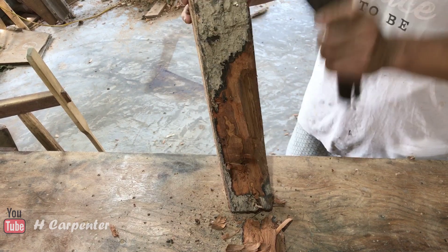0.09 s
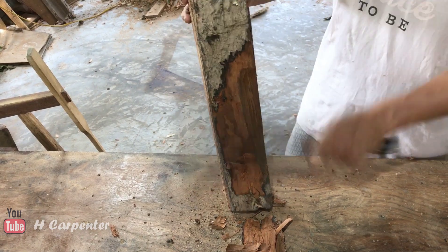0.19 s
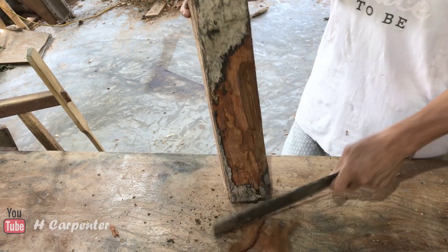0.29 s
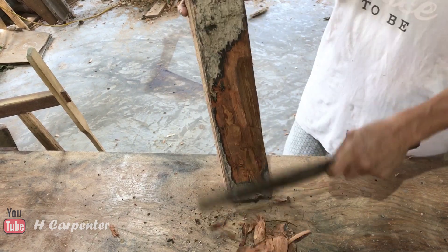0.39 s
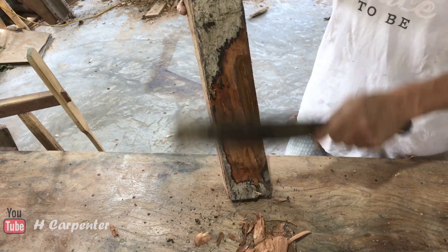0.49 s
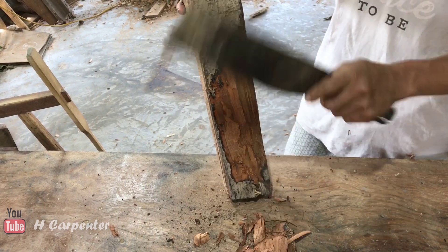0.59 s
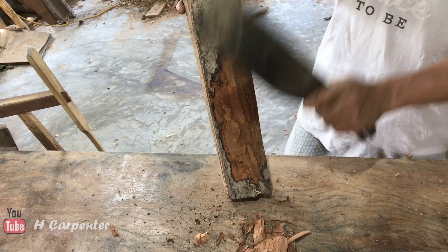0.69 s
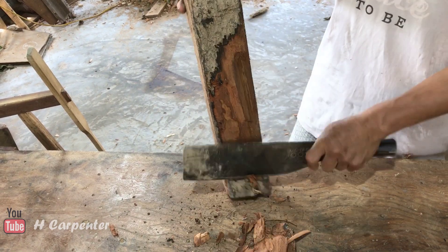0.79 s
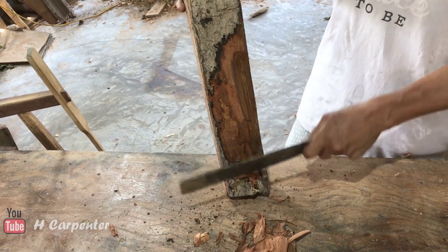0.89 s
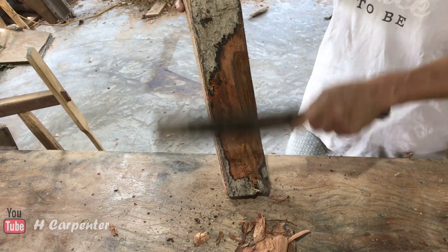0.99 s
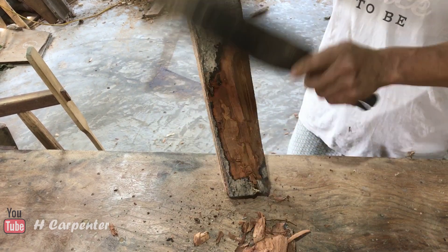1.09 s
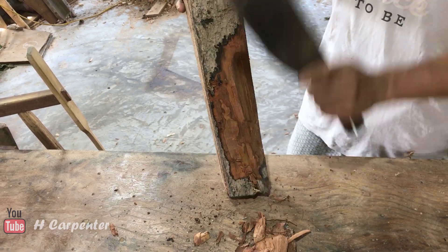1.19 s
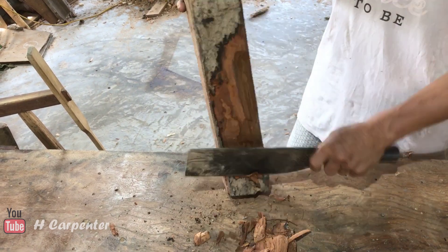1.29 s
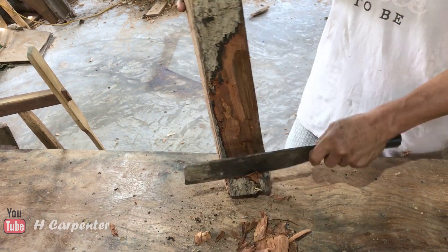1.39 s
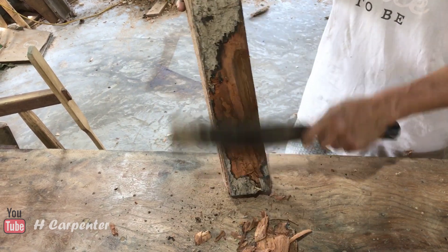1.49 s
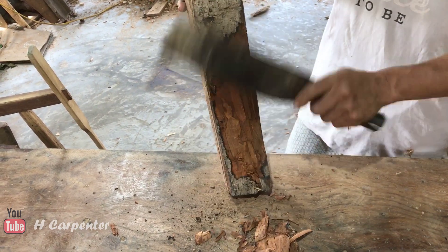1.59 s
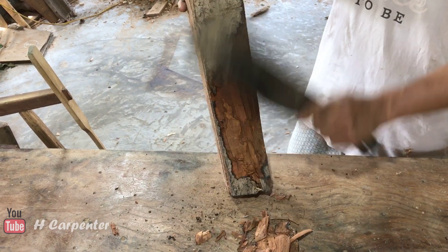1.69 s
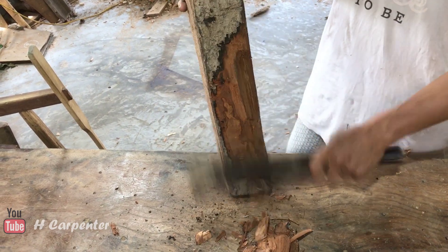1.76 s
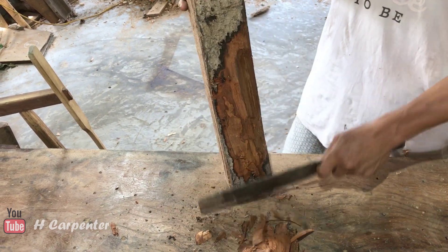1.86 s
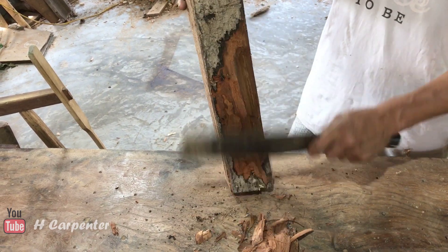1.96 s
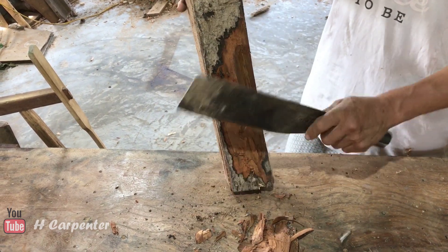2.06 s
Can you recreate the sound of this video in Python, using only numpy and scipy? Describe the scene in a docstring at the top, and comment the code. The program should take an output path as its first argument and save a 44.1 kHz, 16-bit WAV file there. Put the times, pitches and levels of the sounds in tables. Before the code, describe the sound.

A broad blade hews wood with four spaced, sharp knocking blows and low bench thumps

```python
"""A broad blade hews the edge of a board on a workbench in a hard-walled workshop: each blow is a contact
force that rings the board's modes, with fibre noise, a knock, and a thump and hum of the bench.
Two blows tear a chip off strongly and go through onto the bench top; the board hops back twice onto the bench.
Crumbs tick and dust patters as filtered noise; the room adds band-by-band decaying noise.
Behind lie air noise and a low outdoor rumble that swells near 1.4 s; a limiter holds the peaks."""
import sys
import numpy as np
from scipy import signal
from scipy.fft import rfft, irfft
from scipy.io import wavfile
from scipy.ndimage import uniform_filter1d, minimum_filter1d

SR = 44100
rng = np.random.default_rng(int(sys.argv[2]) if len(sys.argv) > 2 else 0)


def waveform_to_disk(signal):
    """Save audio, clipped to [-1, 1], as 16-bit WAV at the path in sys.argv[1]."""
    frames = np.transpose(np.atleast_2d(signal))
    scaled = np.clip(frames, -1, 1) * 32767
    samples = np.round(scaled).astype(np.int16)
    wavfile.write(sys.argv[1], SR, samples)


N = 94815

# modes of the bench top: (f/Hz, level/dB, T60/s)
BENCH_TOP = [(329.7, -4.5, 0.065), (396.7, -8, 0.042), (472, -8, 0.049), (599, -7.5, 0.047),
             (707, -10.5, 0.072), (790, -5, 0.032), (880, -6, 0.044), (941, -8.5, 0.052),
             (1110.4, -0.5, 0.039), (1252, -10, 0.083), (1327, -3, 0.034), (1382, -5, 0.055),
             (1539, -4, 0.032), (3860, -8, 0.0089)]


def amp(db):
    """Decibel law: level in dB to amplitude ratio."""
    return 10 ** (np.asarray(db) / 20)


def rms_one(x):
    """Normalisation: scale to unit rms."""
    return x / np.sqrt(np.mean(x ** 2) + 1e-20)


def at_hz(points, hz):
    """Linear interpolation of a table on a log-frequency axis."""
    table_hz, values = np.array(points).T
    return np.interp(np.log(np.maximum(hz, 1)), np.log(table_hz), values)


def in_time(rows):
    """Linear interpolation of a level curve at every sample."""
    return np.interp(np.arange(N) / SR, *np.transpose(rows))


def colour(x, spectrum):
    """Spectral shaping: weight each frequency of a noise, then set its rms to 1."""
    hz = np.fft.rfftfreq(len(x), 1 / SR)
    shaped = rfft(x) * amp(at_hz(spectrum, hz))
    return rms_one(irfft(shaped, len(x)))


def burst(s, hold_s, fall_s):
    """Exponential relaxation: sudden start at s, a hold, then a fall with time constant fall_s."""
    t = np.arange(N) / SR - s
    return (t >= 0) * np.exp(-np.maximum(t - hold_s, 0) / fall_s)


def ring(drive, modes):
    """Modal superposition: the drive excites damped resonators of slightly random strength."""
    spread_db = 0.5
    out = 0
    for k, (hz, db, t60) in enumerate(modes):
        radius = amp(-60 / (t60 * SR))   # decay per sample
        w = 2 * np.pi * hz / SR
        gain = amp(db + spread_db * rng.standard_normal()) * (-1) ** k   # polarity alternates
        poles = [1, -2 * radius * np.cos(w), radius * radius]
        out = out + signal.lfilter([0, gain * np.sin(w)], poles, drive + 1e-18)
    return out


def contact(s, length_s, judder):
    """Impact excitation: one unit impulse with a judder of small random ones."""
    sparse = rng.standard_normal(N) * (rng.random(N) < .3)
    x = judder * sparse * burst(s, length_s, 0.0046)
    x[int(s * SR)] += 1
    return x


def push(s):
    """Soft impulse: a rounded force pulse, too slow to excite much treble."""
    width_s = 0.0035
    t = np.maximum(np.arange(N) / SR - s, 0) / width_s
    return t * np.exp(-3 * t) * 9 / (width_s * SR)   # unit sum


def thump(s, db):
    """Low-frequency modal response: a soft push into the bench frame."""
    # modes of the bench frame: (f/Hz, level/dB, T60/s)
    frame_modes = [(41.7, -12.5, 0.43), (73, -6, 0.085), (108.3, 1.5, 0.084), (179.3, 4.5, 0.22),
                   (208, 1.5, 0.18), (261, -2, 0.16), (329, 13, 0.1), (423.7, 10, 0.15), (569.3, -53, 0.1),
                   (690, 0, .1)]
    return amp(db) * ring(push(s), frame_modes)


def fibres():
    """Shot noise: dense uneven snaps of splitting wood fibres, spectrally shaped."""
    # spectrum of the splitting: (f/Hz, relative level per Hz/dB)
    hiss_spectrum = [(710, -40), (1200, -9), (1530, -3), (2950, -3), (3220, 0), (5510, -12), (6080, -7.5),
                     (6640, -18), (9130, -12), (10300, -15), (14000, -12.5), (15800, -22), (16500, -61)]
    snaps_per_s = 15000
    snaps = (rng.random(N) < snaps_per_s / SR) * rng.standard_normal(N)
    uneven = snaps * amp(1.2 * rng.exponential(1, N))
    return colour(uneven, hiss_spectrum)


def blows():
    """Impact and fracture: board ring, bite hiss, tearing, bench thump and hum; knocks returned apart."""
    # blade bites: (t/s, bite level/dB, bite hold/s, knock f/Hz, knock level/dB, hiss level/dB,
    #               tearing level/dB, tearing hold/s, thump level/dB, hum level/dB)
    blow_table = [(0.2229, -15.5, 0.0055, 2530, -7, -22, -14.5, 0.023, -17.5, -19.5),
                  (0.7942, -14, .005, 2029, -5.5, -17, -36, 0.028, -14.5, -22.5),
                  (1.3073, -15, 0.0045, 2066, -10.5, -17.5, -41.5, 0.031, -13.5, -35),
                  (1.7784, -18, 0.0078, 2130, -9, -18, -19, .017, -16.5, -29.5)]
    # modes of the board: (f/Hz, level/dB, T60/s)
    board_modes = [(1004, -5.5, 0.041), (1117, -12, 0.037), (1628, -8, 0.072), (1755, -16, 0.069),
                   (2410, -25, 0.0089), (3150, -6, .008), (3820, -5.5, 0.021), (4570, -16, 0.009),
                   (5630, -1.5, 0.0049), (7400, -8, 0.0038), (8800, -23, .006), (11120, -6.5, 0.012),
                   (12700, -3, 0.00513)]
    knock_t60_s, hum_hz, hum_t60_s = .045, 124, .9
    out, knocks, snaps = 0, 0, fibres()
    for s, db, bite_s, knock_hz, knock_db, hiss_db, tear_db, tear_s, thump_db, hum_db in blow_table:
        out = out + amp(db) * ring(contact(s, bite_s, .12), board_modes)
        knocks = knocks + ring(contact(s, bite_s, .05), [(knock_hz, knock_db, knock_t60_s)])
        hum = ring(push(s), [(hum_hz, hum_db, hum_t60_s)])
        out = out + thump(s, thump_db) + hum
        hiss = amp(hiss_db) * burst(s, bite_s, 0.0018)
        tearing = amp(tear_db) * burst(s, tear_s, 0.0061)
        out = out + snaps * (hiss + tearing)
    return out, knocks


def landings():
    """Impact on a plate: the blade strikes the bench top and rattles; a one-pole low-pass softens it."""
    # blade lands: (t/s, level before softening/dB, rattle hold/s, thump level/dB)
    landing_table = [(0.2476, -11, 0.0397, -17), (1.8078, -11.5, 0.035, -18)]
    out = 0
    for s, db, rattle_s, thump_db in landing_table:
        top = ring(contact(s, rattle_s, .065), BENCH_TOP)
        softened = signal.lfilter([.4], [1, -.6], top)
        out = out + amp(db) * softened + thump(s, thump_db)
    return out


def board_hops():
    """Secondary impact: the board knocks back onto the bench with a thump and a low-passed rattle."""
    # board knocks back: (t/s, thump level/dB, rattle level before low-pass/dB)
    hop_table = [(.851, -25, -40.5), (1.348, -19, -28.5)]
    rattle_hold_s, cut_hz = 0.029, 670
    dull = signal.butter(4, cut_hz, fs=SR, output="sos")
    out = 0
    for s, db, rattle_db in hop_table:
        rattle = ring(contact(s, rattle_hold_s, 0.18), BENCH_TOP)
        out = out + thump(s, db) + amp(rattle_db) * signal.sosfilt(dull, rattle)
    return out


def crumbs():
    """Band-limited transients: tiny bright ticks, each a few milliseconds of narrow noise."""
    # crumbs land: (t/s, level before band-pass/dB, centre f/Hz)
    crumb_table = [(0.188, -56, 13800), (1.0506, -46, 7900), (1.087, -54, 14500), (1.9296, -41.5, 14000),
                   (1.986, -49, 10800), (2.0159, -46, 10200), (2.028, -51, 12100), (2.048, -49, 6950),
                   (2.0977, -57, 14300), (2.12, -57, 14100)]
    out = 0
    for s, db, hz in crumb_table:
        band = [hz * .8, min(hz * 1.2, .45 * SR)]
        sos = signal.butter(2, band, "band", fs=SR, output="sos")
        tick = rng.standard_normal(N) * burst(s, 0.00068, .0015)
        out = out + amp(db) * signal.sosfilt(sos, tick)
    return out


def dust():
    """Shot noise: sparse high-passed grains patter after the last chip and die away exponentially."""
    start_s, fall_s, start_db = 1.86, .3, -63
    grains_per_s, cut_hz = 1500, 7000
    grains = (rng.random(N) < grains_per_s / SR) * rng.standard_normal(N)
    bright = signal.sosfilt(signal.butter(4, cut_hz, "high", fs=SR, output="sos"), grains)
    return amp(start_db) * rms_one(bright) * burst(start_s, 0, fall_s)


def workshop(x):
    """Diffuse reverberation: convolution with noise that decays exponentially in each half-octave."""
    # reverberation time: (f/Hz, T60/s)
    room_t60 = [(60, 0.35), (250, 0.4), (600, 0.55), (1200, 0.53), (3000, 0.4), (6000, 0.39), (11000, 0.26),
                (16000, 0.34)]
    # reverberant energy by band: (f/Hz, relative level/dB)
    room_colour = [(60, -1.5), (250, -0.5), (600, 1.86), (1200, -0.1), (3000, -4.5), (6000, 1.4),
                   (11000, -3), (16000, -4.5)]
    room_db, start_s = -7.5, 0.0027
    t, tail = np.arange(SR) / SR, 0
    edges = 30 * 2 ** np.arange(0, 9.6, .5)
    white = rng.standard_normal((2, SR))   # neighbouring bands use different noises
    for k, (low, high) in enumerate(zip(edges, edges[1:])):
        hz = np.sqrt(low * high)
        t60 = at_hz(room_t60, hz)
        band = signal.sosfilt(signal.butter(2, [low, high], "band", fs=SR, output="sos"), white[k % 2])
        decay = amp(at_hz(room_colour, hz) - 60 * t / t60)
        tail = tail + band * decay / np.sqrt(t60 * SR / 14)   # energy independent of T60
    tail = tail * np.clip(t / start_s - 1, 0, 1)   # silent until start_s, full at twice that
    return amp(room_db) * signal.fftconvolve(x, tail)[:N]


def air_noise():
    """Stationary random noise: shaped in spectrum, with a drifting level."""
    # spectrum: (f/Hz, relative level per Hz/dB)
    air_spectrum = [(240, -56), (400, -7.5), (600, -12.5), (658, -5), (711, -5.5), (1050, -2.5), (1480, -3),
                    (2550, -9), (2710, -4.5), (4610, -13), (5060, -13), (5640, -16), (10500, -30),
                    (13700, -26.5), (16500, -46.5)]
    # level curve: (t/s, level/dB)
    air_level = [(0.0, -59), (0.24, -58), (0.39, -51.5), (0.57, -61), (0.84, -60.5), (0.95, -56.5),
                 (1.6, -58), (2.15, -55.5)]
    air = colour(rng.standard_normal(N), [(200, -56)] + list(air_spectrum))
    return air * amp(in_time(air_level))


def outdoor_rumble():
    """Amplitude modulation: low noise on a level curve, made lumpy by slow random level changes."""
    # spectrum: (f/Hz, relative level per Hz/dB)
    rumble_spectrum = [(12, -14), (20, -7.5), (76, -8.5), (124, -9), (145, -13), (212, -16.5), (231, -23.5),
                       (278, -16.5), (381, -37), (600, -38), (780, -69), (1320, -120)]
    # level curve: (t/s, level/dB)
    rumble_level = [(0.0, -44.5), (0.15, -44.5), (0.36, -47), (0.51, -52), (0.76, -46), (0.92, -42.5),
                    (1.23, -45), (1.39, -29), (1.56, -45), (2.15, -45.5)]
    lumps_db, lumps_cut_hz = 0.5, 12
    slow = signal.butter(2, lumps_cut_hz, fs=SR, output="sos")
    lumps = rms_one(signal.sosfilt(slow, rng.standard_normal(N + SR))[SR:])   # filter settles first
    spectrum = [(10, -48)] + list(rumble_spectrum) + [(1000, -69)]
    rumble = colour(rng.standard_normal(N), spectrum)
    return rumble * amp(in_time(rumble_level) + lumps_db * lumps)


def scene():
    """Superposition of direct and reverberant sound; the knock beams at the listener and stirs the room less."""
    knock_to_room_db = -7
    board, knocks = blows()
    work = board + landings() + board_hops() + crumbs() + dust()
    reverberation = workshop(work + amp(knock_to_room_db) * knocks)
    return (work + knocks + reverberation + air_noise() + outdoor_rumble())[None]


def record(dry):
    """Peak limiting: look-ahead gain reduction with a fast release, then a steep low-pass."""
    limit_db, release_db_per_s, window_s, stop_edge_hz = -8.2, 1200, .001, 16700
    ramp = release_db_per_s * np.arange(N) / SR
    span = max(int(window_s * SR), 2)
    over = np.maximum(20 * np.log10(np.abs(dry[0]) + 1e-9) - limit_db, 0)
    held = np.maximum(np.maximum.accumulate(over + ramp) - ramp, 0)   # falls at the release rate
    widest = -minimum_filter1d(-held, span + 1)   # running maximum, reaching ahead of each peak
    cut = uniform_filter1d(widest, span)
    low_pass = signal.cheby2(14, 70, stop_edge_hz, fs=SR, output="sos")
    return signal.sosfilt(low_pass, dry * amp(-cut))


dry = scene()
out = record(dry)
waveform_to_disk(out)
```